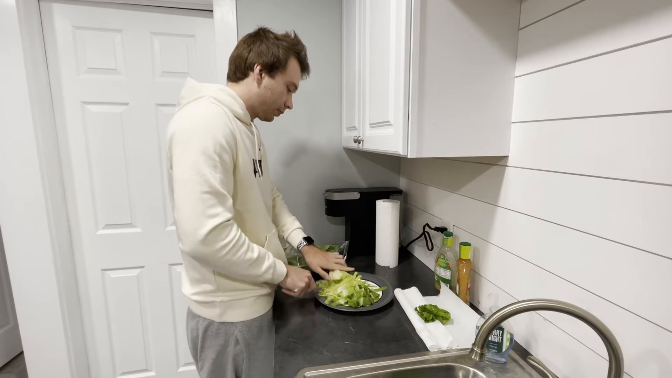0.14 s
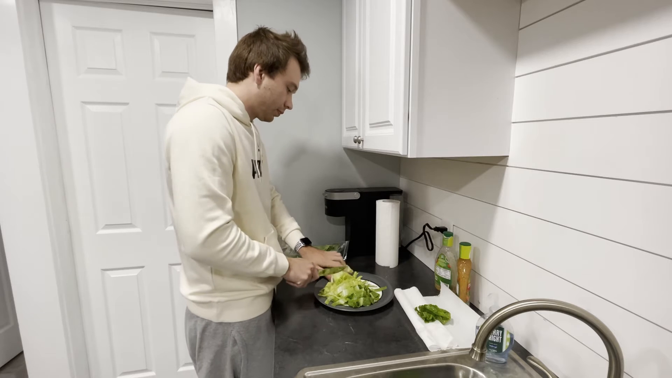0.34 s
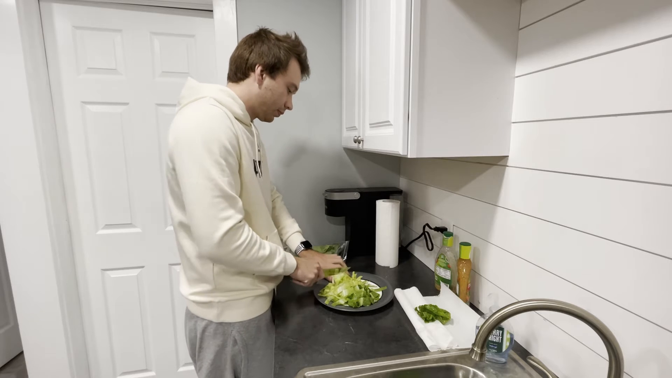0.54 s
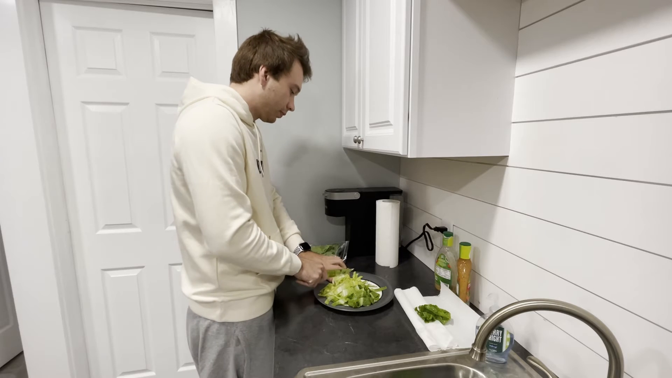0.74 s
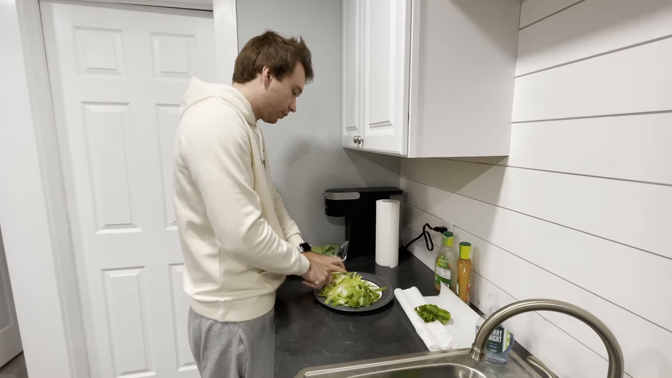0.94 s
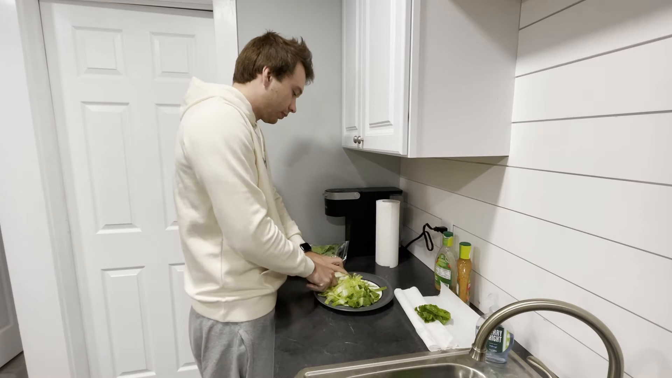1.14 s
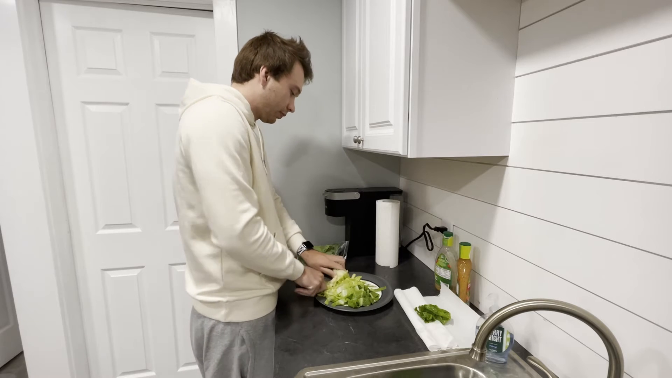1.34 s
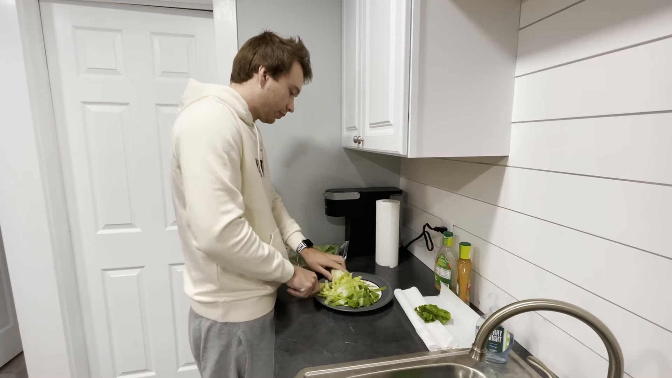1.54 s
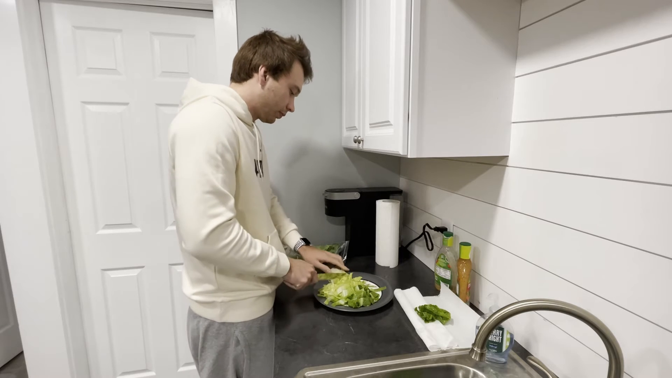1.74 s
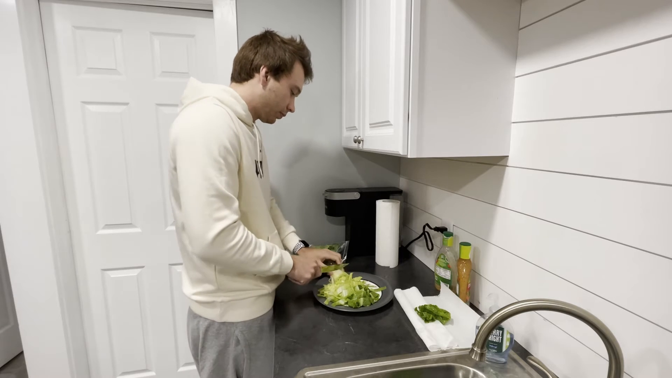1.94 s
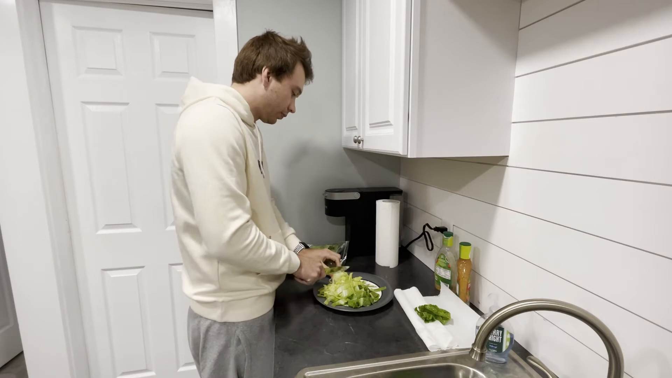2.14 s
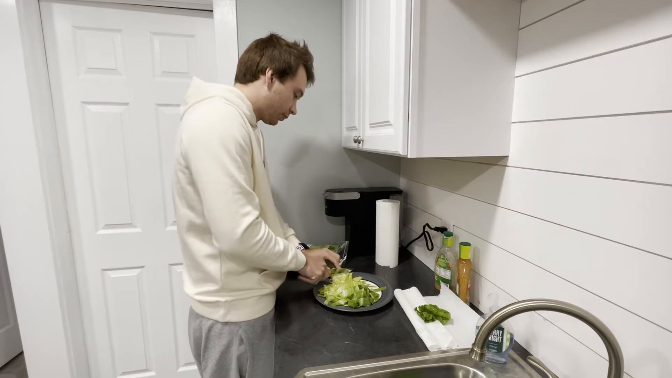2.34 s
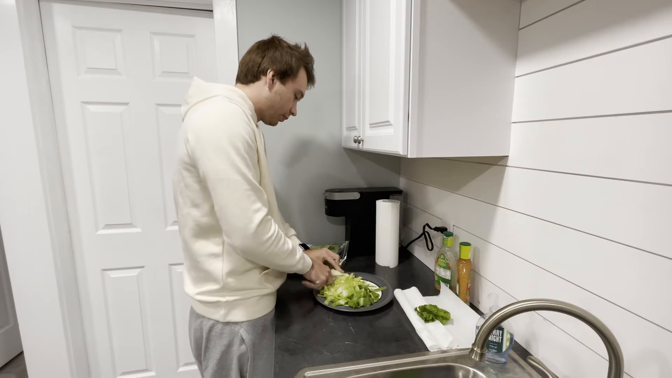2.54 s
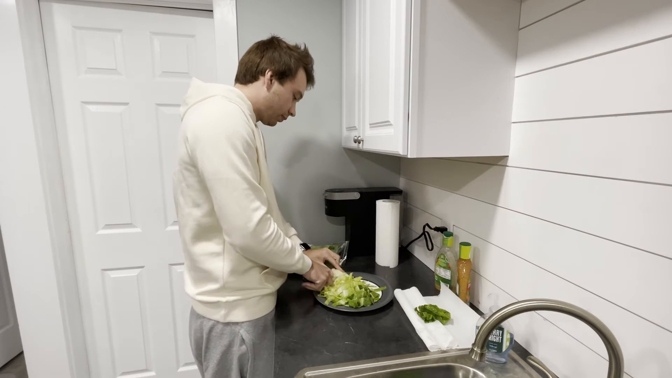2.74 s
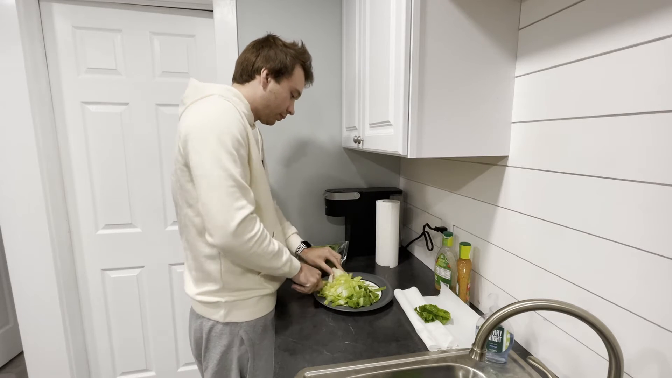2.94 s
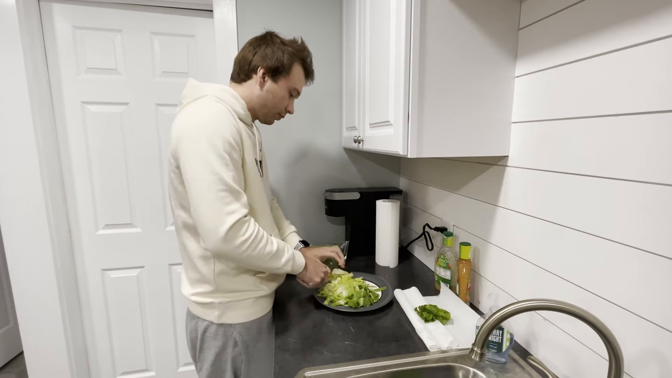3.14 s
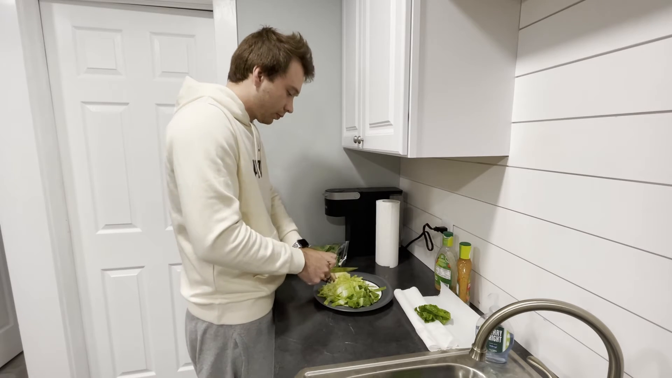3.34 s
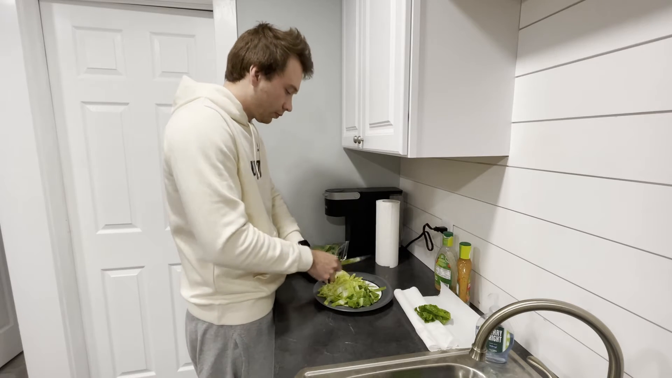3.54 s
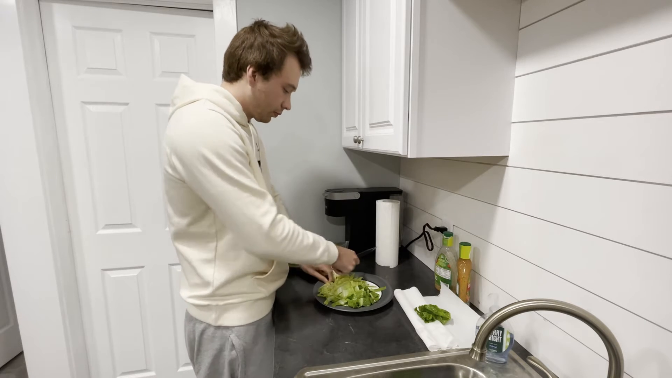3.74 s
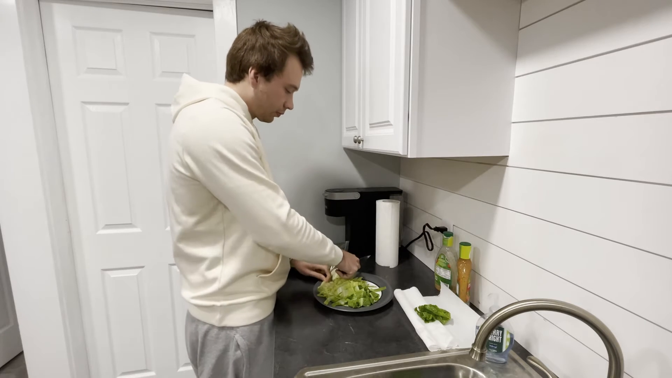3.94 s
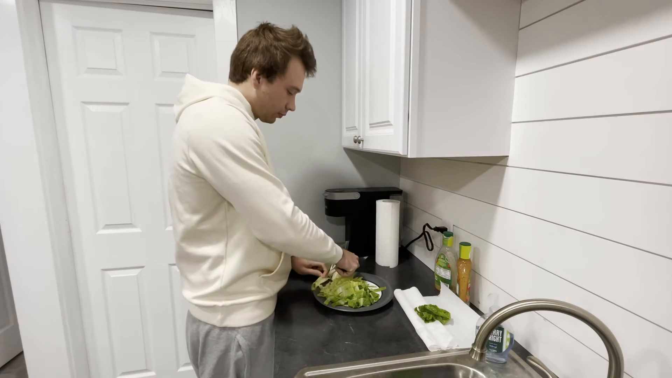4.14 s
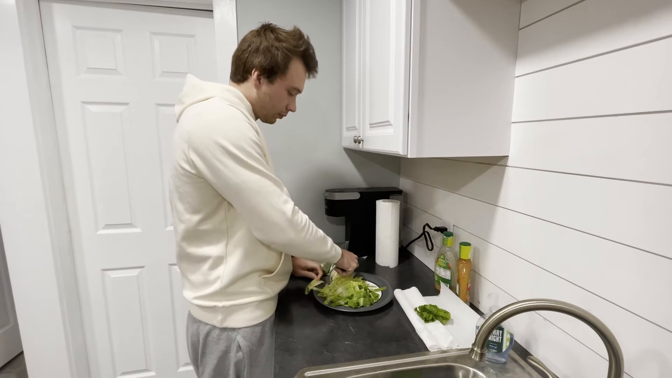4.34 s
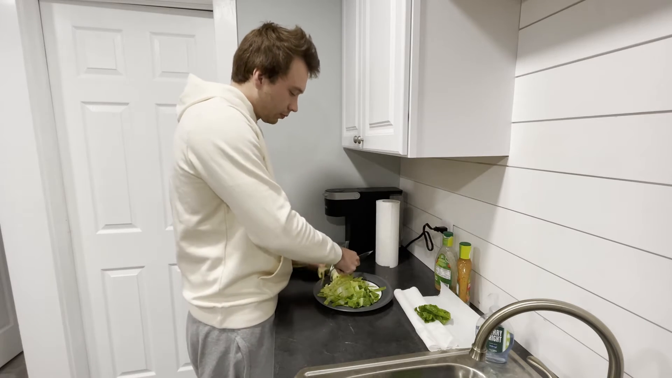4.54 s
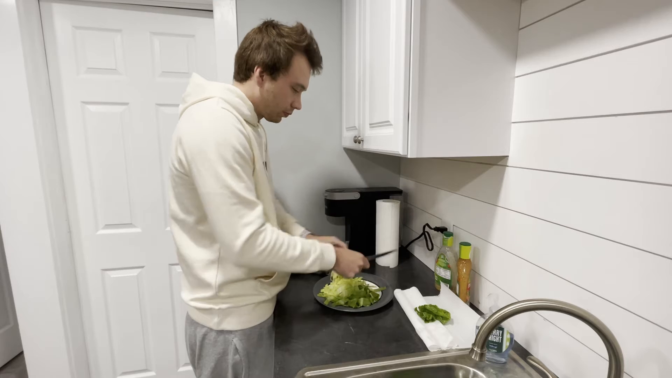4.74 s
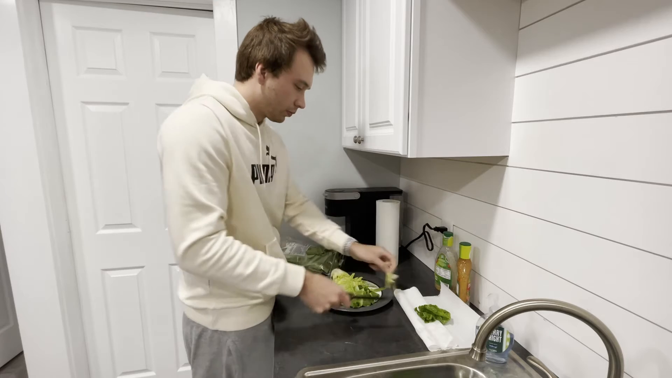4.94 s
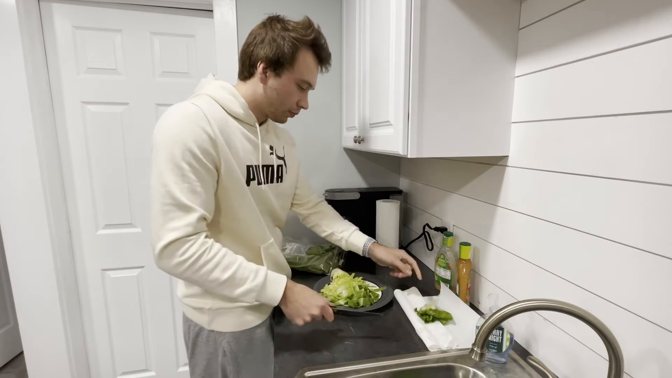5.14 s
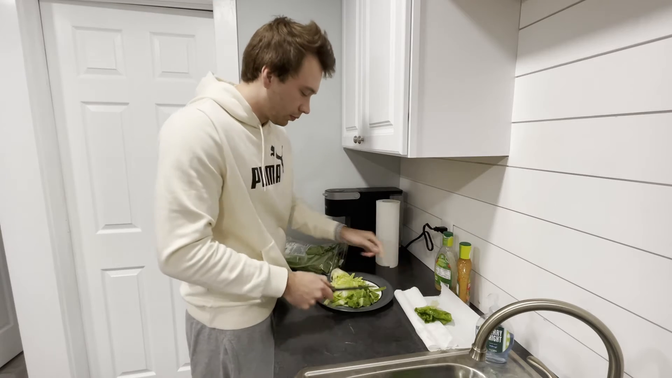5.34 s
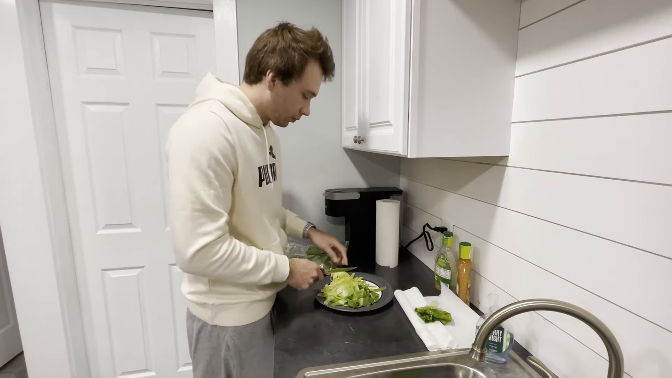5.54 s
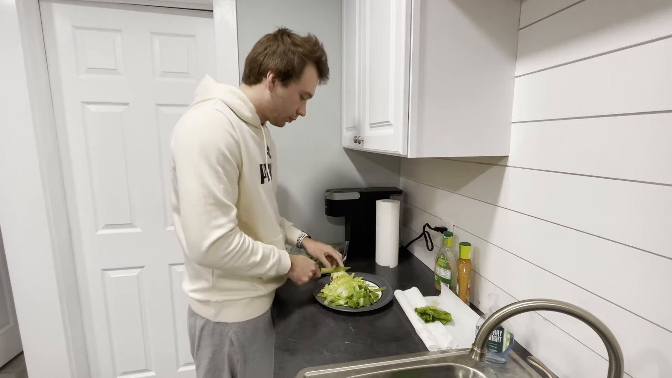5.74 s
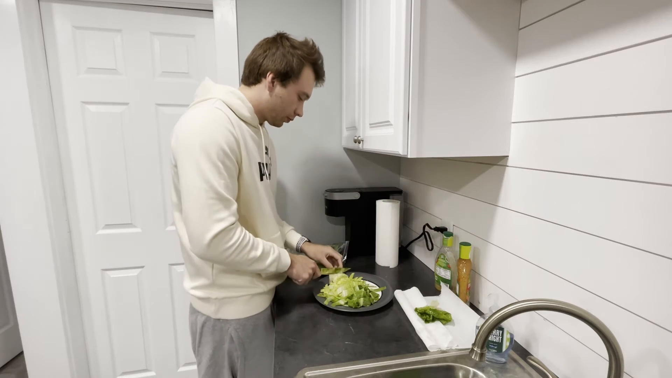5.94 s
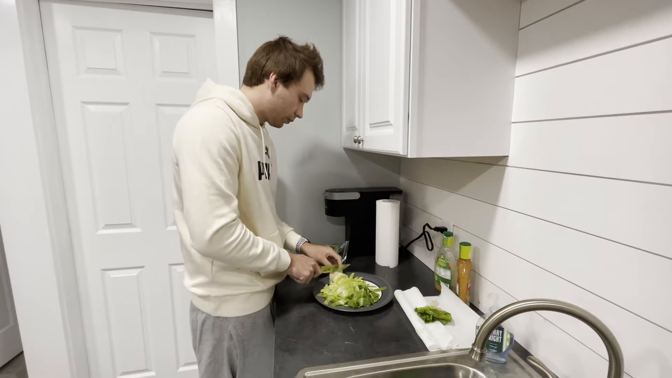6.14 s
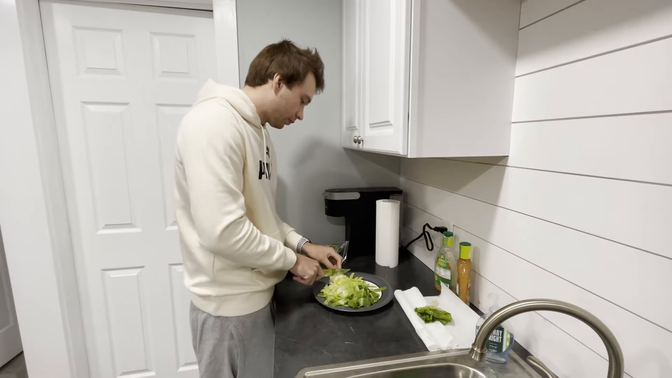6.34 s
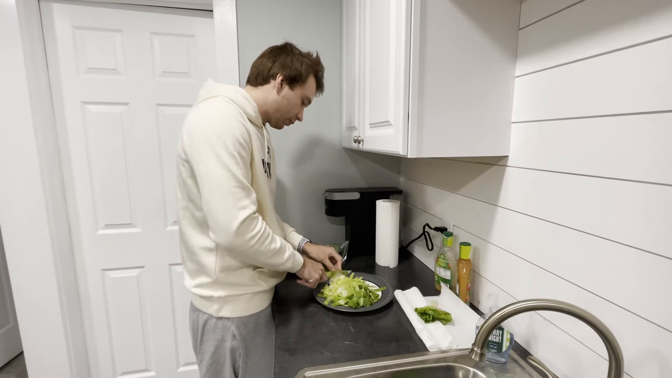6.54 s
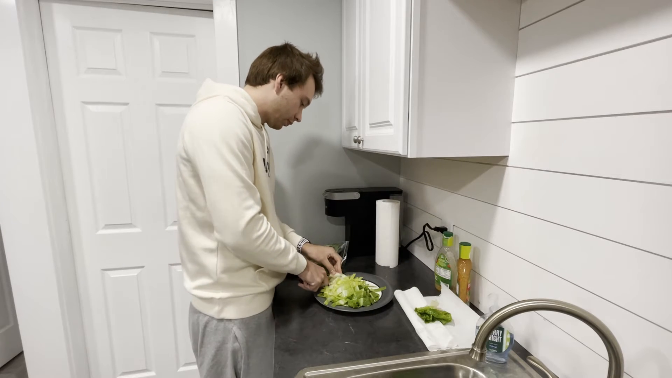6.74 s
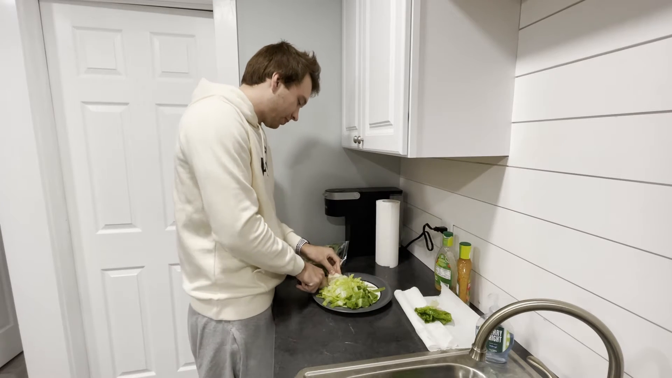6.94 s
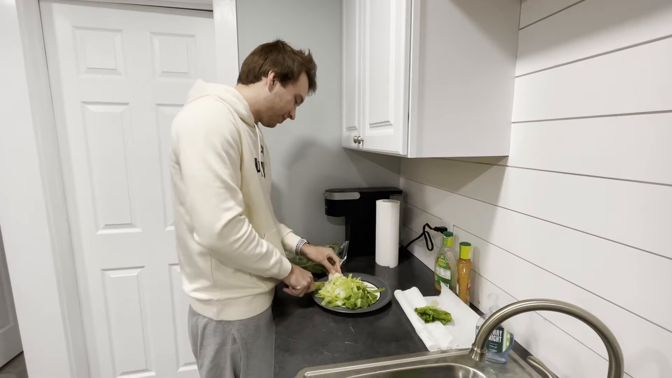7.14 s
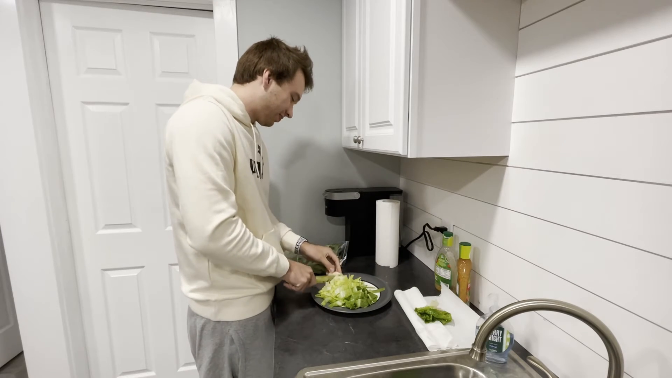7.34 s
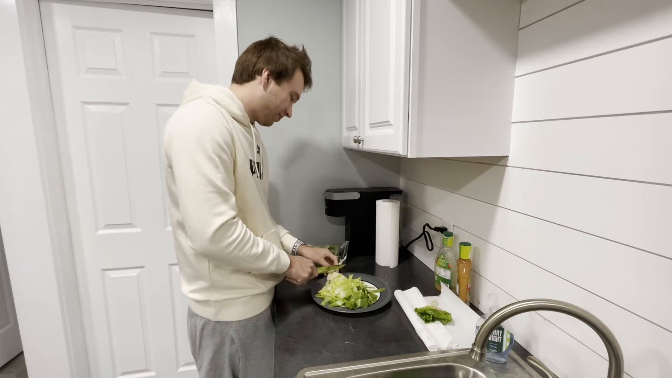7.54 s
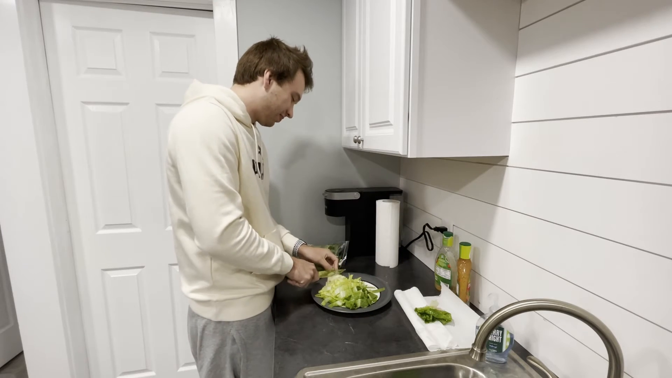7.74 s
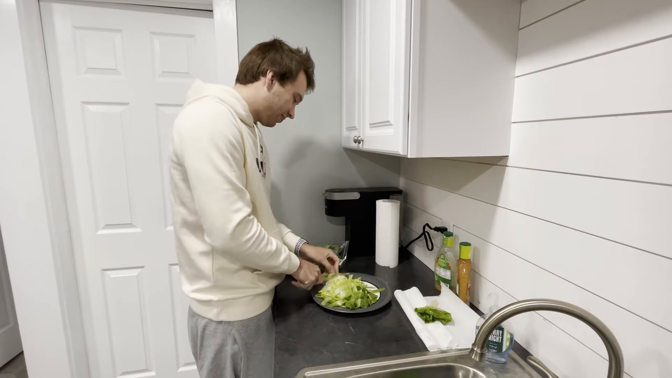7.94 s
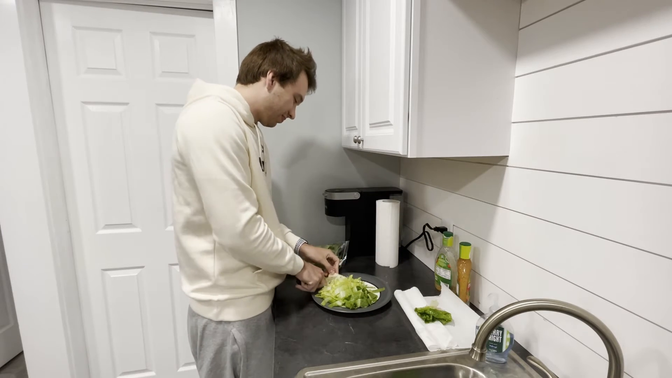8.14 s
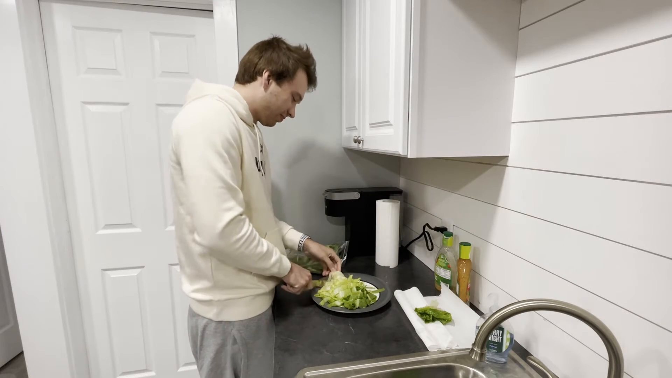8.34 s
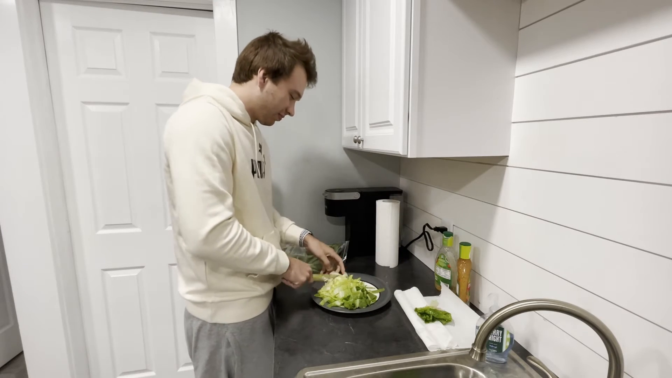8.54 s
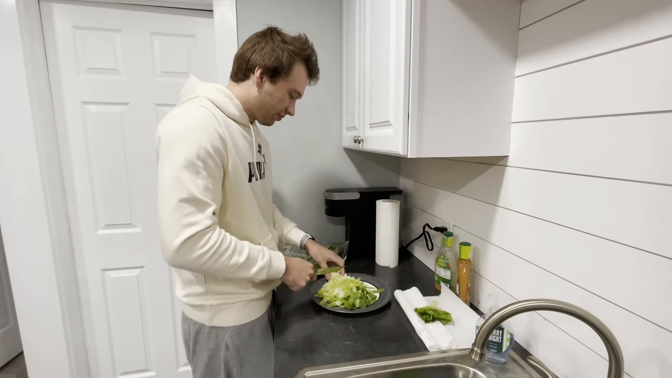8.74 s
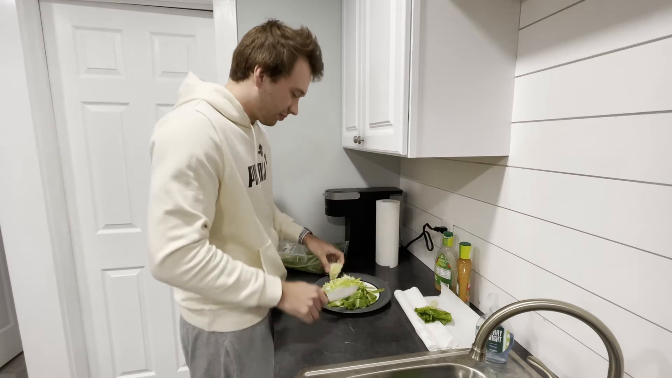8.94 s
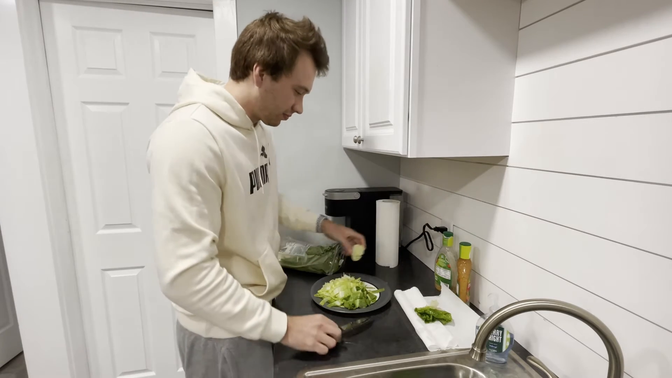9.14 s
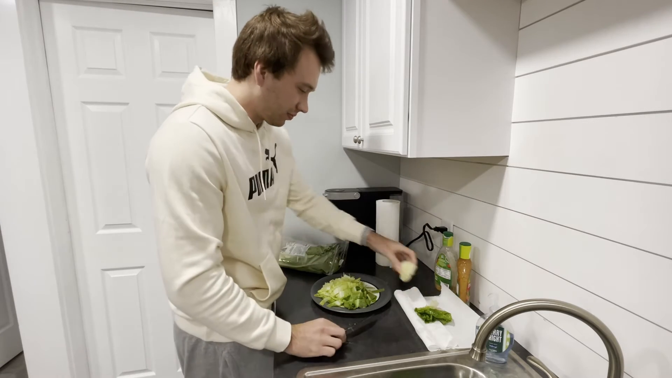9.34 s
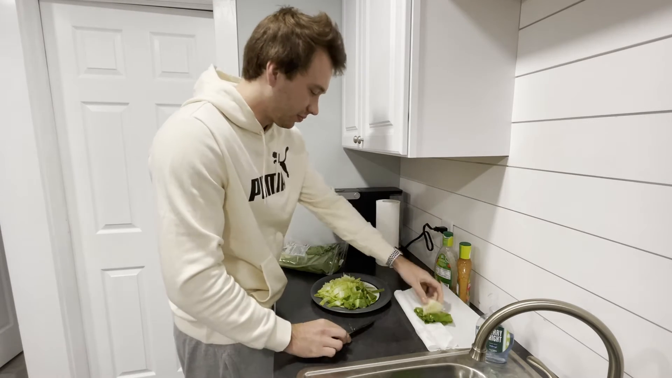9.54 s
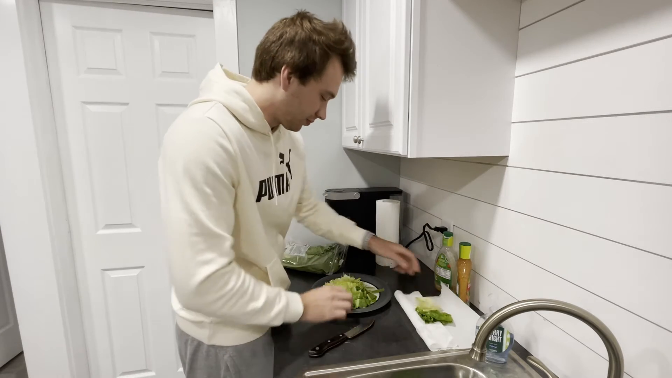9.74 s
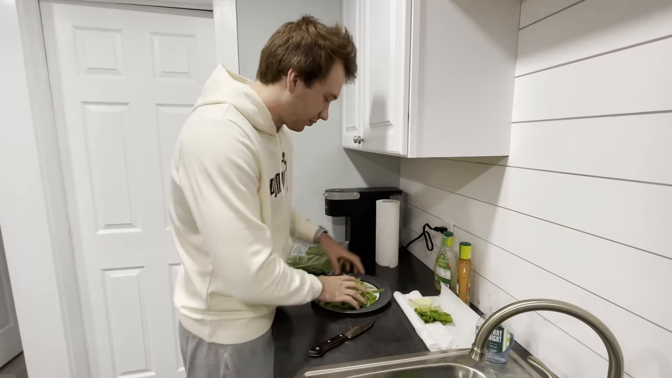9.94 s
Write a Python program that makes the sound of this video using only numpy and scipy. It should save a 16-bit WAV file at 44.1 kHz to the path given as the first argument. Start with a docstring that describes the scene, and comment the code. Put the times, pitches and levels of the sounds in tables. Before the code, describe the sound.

Crisp lettuce is cut on a plate at a kitchen counter, heard near in stereo with short room reflections and low background rush. Each slice builds from crackle and snapping ribs through a dull push to a bright clack, usually with a short scrape. Four cuts come unevenly, the last two loudest, separated by sparse leaf rustles and soft bumps. A knife is put down at the end.

```python
"""A short scrape of a blade on a plate, already under way, over the low steady rush of the house.
Then a knife slices four times through crisp lettuce: leaves crackle and snap (random click trains and
noise bursts through resonances), the push rumbles through the counter (low-coloured clicks), and
the blade clacks on the plate (coloured pulses, beating modes) and scrapes out (pressed resonances).
Between cuts the leaves are handled; at the end the knife is put down on the counter."""
import sys
import numpy as np
from scipy import signal
from scipy.fft import rfft, irfft
from scipy.io import wavfile
from scipy.ndimage import uniform_filter1d

SR = 44100
rng = np.random.default_rng(int(sys.argv[2]) if len(sys.argv) > 2 else 0)


def materialize(psi):
    """Save the field psi as 16-bit PCM at rate SR to the path in sys.argv[1].

    A 1-D psi becomes a single channel; in a 2-D psi each row is a channel.
    """
    bounded = np.clip(np.atleast_2d(psi).T, -1, 1)
    quanta = np.round(bounded * 32767).astype(np.int16)
    wavfile.write(sys.argv[1], SR, quanta)


N = 440997


def amp(db):
    """Decibels to gain."""
    return 10 ** (np.asarray(db) / 20)


def unit(x):
    """Scales to an rms of one."""
    return x / np.sqrt(np.mean(x ** 2) + 1e-20)


def read(points, hz):
    """Interpolates a table on a log-frequency axis."""
    f, value = np.transpose(points)
    return np.interp(np.log(hz + 1), np.log(f + 1), value)


def add(mix, start_s, sound):
    """Adds a sound at a time; it may already be under way at zero."""
    at = round(start_s * SR)
    sound = sound[max(-at, 0):]
    part = mix[max(at, 0):][:len(sound)]
    part += sound[:len(part)]


def click(points, corner_hz=1e6, size=4096):
    """Causal (minimum-phase) pulse of unit energy with a given spectrum, dulled above a corner."""
    hz = abs(np.fft.fftfreq(size, 1 / SR))
    gain = amp(read(points, hz)) / np.sqrt(1 + (hz / corner_hz) ** 4)
    log_gain = np.log(gain + 1e-5)
    pulse = np.fft.ifft(np.exp(np.conj(signal.hilbert(log_gain)))).real
    return pulse / np.linalg.norm(pulse)


def colour(x, points, corner_hz=1e6):
    """Filters a sound by a spectrum."""
    return signal.oaconvolve(x, click(points, corner_hz))[:len(x)]


def resonate(x, hz, width_hz):
    """Steep resonance of gain one that can follow a pitch curve: shift to zero, lowpass, shift back."""
    turn = np.exp(2j * np.pi * np.cumsum(hz * np.ones(len(x))) / SR)
    r = np.exp(-np.pi * width_hz / SR)
    shifted = x * turn.conj() + 1e-18
    return 2 * (turn * signal.lfilter([(1 - r) ** 2], [1, -2 * r, r ** 2], shifted)).real


def grains(per_s, spread_db, cap=2.9):
    """Random train of tiny clicks of either sign, their sizes spread exponentially in dB up to a cap."""
    size = amp(spread_db * np.minimum(rng.exponential(1, N), cap))
    sign = rng.choice([-1, 1], N)
    return unit(size * sign * (rng.random(N) < per_s / SR))


def envelope(length_s, attack_s, release_s):
    """Attack, hold and release of one movement, and its progress from 0 to 1."""
    t = np.arange(0, length_s + 8 * release_s, 1 / SR)
    gain = np.minimum(t / attack_s, 1) * np.exp(-np.maximum(t - length_s, 0) / release_s)
    return gain, np.minimum(t / length_s, 1)


# left-right coherence: hz, likeness (0-1)
LIKENESS = [(60, 0.89), (130, 0.87), (290, 0.46), (640, 0.067), (1400, 0.035), (2400, 0.48), (4400, 0.033),
            (8000, 0.88), (14000, 0.5)]
# left minus right: hz, balance_db
BALANCE = [(60, -2.5), (200, -4), (380, -0.5), (700, 2.5), (1300, 1), (2400, 1.5), (4400, 4), (8000, -2),
           (14000, -2.5)]
# phase by which the left leads: hz, lead_rad
LEAD = [(340, 0), (1400, 0), (3200, 0.37), (5000, 0.96), (7500, 0.37)]


def ports(pair):
    """Two unrelated signals become a microphone pair, alike to a degree that varies with frequency."""
    a, b = rfft(pair)
    hz = np.fft.rfftfreq(pair.shape[1], 1 / SR)
    same = np.clip(read(LIKENESS, hz), -1, 1)
    lean = amp(read(BALANCE, hz) / 2)
    left = a * lean * np.exp(1j * read(LEAD, hz))
    right = (same * a + np.sqrt(1 - same ** 2) * b) / lean
    return irfft(np.array([left, right]), pair.shape[1])


# spectrum of the house rush: hz, level_db
AIR_COLOUR = [(15, -45.5), (25, -26), (48, -3.5), (96, 2), (178, -16), (253, -10), (421, -9), (482, -17),
              (552, -9.5), (598, -18.5), (997, -15.5), (1140, -23), (1530, -26), (3170, -43),
              (10500, -50.5), (15500, -63.5)]


def air(level_db=-53.5):
    """The low steady rush of the house: coloured stereo noise."""
    noise = rng.standard_normal((2, N + 4097))
    coloured = np.array([colour(n, AIR_COLOUR) for n in noise])
    return amp(level_db) * unit(ports(coloured)[:, -N:])


# decay of the kitchen: hz, t60_s
ROOM_T60 = [(60, 1.5), (200, 1.12), (600, 0.79), (2000, 0.6247), (4000, 0.5969), (9000, 0.54), (15000, 0.5)]


def kitchen(x, tail_db, early_s=.0095, direct=2.5, bass_hz=220, size=32768):
    """Counter, wall and cupboard answer within a few milliseconds; then the small room dies away."""
    t = np.arange(size) / SR
    taps = rng.choice([-1., 1.], (2, size)) * (rng.random((2, size)) < 2000 / SR)
    early = taps * (t < early_s)
    early[0, 0] = direct
    # flatten the spectrum repeatedly: reflections scatter with little colour
    for _ in range(12):
        z = rfft(early)
        early = irfft(z / (abs(z) + 1e-9)) * (t < 2 * early_s)
    hz, at, z = signal.stft(taps * (t > early_s), SR, nperseg=256)
    fade = np.exp(-np.log(1000) * at / read(ROOM_T60, hz)[:, None])
    tail = signal.istft(z * fade, SR, nperseg=256)[1][:, :size]
    # light walls let the bass out
    tail = signal.sosfilt(signal.butter(1, bass_hz, "high", fs=SR, output="sos"), tail)
    response = unit(early) + amp(tail_db) * unit(tail)
    response = np.pad(response, [(0, 0), (size, 0)]) / np.sqrt(size)
    return signal.fftconvolve(x[None], ports(response), axes=1)[:, size:N + size]


# blade pushed down through the head, one to three per cut: start_s, length_s, crackle_db, leaf_body_db,
# counter_push_db, build_up_db, first_resonance_hz, last_resonance_hz
STROKES = [(0.85, .33, -39, -37, -29.5, 15.5, 1270, 1110),
           (1.217, 0.16, -34.5, -53, -34.5, 29.5, 1550, 1400),
           (2.297, 0.27, -41.5, -48.5, -32.5, 22.5, 1949, 1513),
           (2.562, 0.13, -36, -46.5, -27.5, 8, 1500, 1089),
           (6.304, 0.48, -51, -52.5, -44, 12.5, 1880, 1782),
           (6.634, 0.078, -43.5, -45, -29.5, 1.5, 1520, 2465),
           (6.796, 0.062, -33.5, -39.5, -26.5, 5.5, 1970, 1739),
           (7.796, 0.37, -35.5, -39, -27, 34, 2200, 1858)]
BITE_S, LET_GO_S, BUILD_CURVE = 0.0059, 0.018, 1.5


def pressing(layer):
    """Stroke gain of layer 0 crackle, 1 leaf body or 2 push: builds up, levels off, lets go."""
    out = np.zeros(N)
    for start_s, length_s, *layers_db, build_db, _, _ in STROKES:
        gain, depth = envelope(length_s, BITE_S, LET_GO_S)
        add(out, start_s, gain * amp(layers_db[layer] - build_db * (1 - depth) ** BUILD_CURVE))
    return out


def leaf_pitch(rest_hz=1650):
    """Hollow pitch of the packed leaves over time: it glides during each stroke."""
    hz = np.full(N, float(rest_hz))
    for start_s, length_s, *_, first_hz, last_hz in STROKES:
        depth = envelope(length_s, BITE_S, LET_GO_S)[1]
        hz[round(start_s * SR):][:len(depth)] = first_hz + (last_hz - first_hz) * depth
    return hz


# edge dragged out over the plate: start_s, length_s, scrape_db, crackle_db, counter_push_db, easing_off_db
SCRAPES = [(-.03, 0.12, -33, -44, -32.5, 13), (1.372, 0.19, -32.5, -49.5, -29, 21.5),
           (2.8, 0.15, -45.5, -42.5, -36.5, 0.5), (7.043, 0.095, -41.5, -42, -44, -0.5),
           (8.349, 0.07, -37.5, -52.5, -44, 8)]
DRAG_ATTACK_S, DRAG_RELEASE_S = 0.016, 0.02


def dragging(layer):
    """Scrape gain of layer 0 scrape, 1 crackle or 2 push: the edge catches, then its level slides."""
    out = np.zeros(N)
    for start_s, length_s, *layers_db, ease_db in SCRAPES:
        gain, progress = envelope(length_s, DRAG_ATTACK_S, DRAG_RELEASE_S)
        add(out, start_s, gain * amp(layers_db[layer] - ease_db * progress))
    return out


# worktop and cupboard modes: hz, level_db
COUNTER = [(172, -4), (308, -1), (348, -3), (407, -2.5), (552, -1.5), (663, -1.5), (815, -3), (893, -0.5),
           (940, -1), (1100, -0.5), (1413, -3.5)]
# spectrum of the deep thud: hz, level_db
THUD_COLOUR = [(20, -33.5), (42, -24.5), (62, 4), (140, -0.5), (220, -10), (320, -7), (500, -14),
               (1200, -23.5), (5000, -48)]
# spectrum of the hollow clatter: hz, level_db
CLATTER_COLOUR = [(40, -39), (150, -14), (230, -11), (310, -7), (420, -3), (520, -10.5), (660, -4),
                  (800, -3.5), (1100, -4.5), (1600, -8), (2150, -9.5), (2900, -16.5), (6000, -14),
                  (15000, -16.5)]
COUNTER_T60_S, COUNTER_RING_DB = .2, -4


def knock(corner_hz, clatter_db, fade_s, first_db, size=16384):
    """Firm contact and chatter on the counter: deep thud, hollow clatter and worktop ring."""
    t = np.arange(size) / SR
    contacts = rng.standard_normal((2, size)) * np.exp(-t / fade_s)
    contacts[:, 0] = amp(first_db)
    thud = unit(colour(contacts[0], THUD_COLOUR, corner_hz))
    clatter = unit(colour(contacts[1], CLATTER_COLOUR, corner_hz))
    modes = np.zeros(size)
    for hz, db in COUNTER:
        gain = amp(db) * rng.choice([-1, 1]) / np.hypot(1, (hz / corner_hz) ** 2)
        modes += gain * np.sin(2 * np.pi * hz * t)
    ring = unit(modes * np.exp(-np.log(1000) * t / COUNTER_T60_S))
    hollow = unit(clatter + amp(COUNTER_RING_DB) * ring)
    return (thud + amp(clatter_db) * hollow) / np.sqrt(size)


# hand, blade and plate bump the counter: start_s, level_db, corner_hz, fade_s
KNOCKS = [(.742, -27.5, 300, 0.025), (2.566, -19, 246, 0.0077), (4.058, -37, 200, 0.015),
          (4.118, -36, 252, 0.016), (4.336, -33.5, 180, 0.026), (5.273, -34.5, 917, .005),
          (5.294, -45.5, 1140, 0.048), (5.944, -35.5, 178, 0.019), (7.149, -20.5, 499, 0.038),
          (7.275, -24.5, 324, 0.033), (7.968, -17, 189, 0.013), (8.357, -16, 694, 0.013),
          (8.39, -19.5, 455, 0.022), (8.624, -31, 180, .018), (8.68, -29.5, 231.4, 0.011)]
# blade meets plate: start_s, level_db, weight_db, corner_hz, ring_db, favoured_hz, favoured_db, thud_db
CLACKS = [(1.358, -11, -15, 3500, 2, 2050, 6.5, -37), (1.49, -41.5, -11.5, 3500, 13.5, 1280, 4, -69),
          (2.692, -12, -7, 4300, 0.5, 2750, -1, -26), (2.955, -33, -13.5, 5000, 9.5, 1240, 15.5, -73),
          (3.133, -38, -7, 5000, -15, 2540, 29, -58), (3.9858, -47.5, -4, 4000, 6.5, 2450, 8, -65),
          (6.8719, -0.5, -2.5, 6310, -1.5, 3280, 1, -13.5), (8.145, 0, 2.5, 8780, -4, 2804, -0.5, -17),
          (8.359, -29, -11, 3200, 6.5, 3700, 8, -47.5)]
# cut blow passed through the plate to the counter
THUD_CORNER_HZ, THUD_FADE_S = 706, 0.034
# a blow with a higher corner has more clatter; it equals the thud at CLATTER_EVEN_HZ
CLATTER_EVEN_HZ, CLATTER_DB_PER_OCTAVE = 713.5, 10


def knocks(gain_db=20):
    """The counter answers each bump and each blow of the blade on the plate."""
    out = np.zeros(N)
    thuds = [(start_s, thud_db, THUD_CORNER_HZ, THUD_FADE_S) for start_s, *_, thud_db in CLACKS]
    for start_s, db, corner_hz, fade_s in list(KNOCKS) + thuds:
        clatter_db = CLATTER_DB_PER_OCTAVE * np.log2(corner_hz / CLATTER_EVEN_HZ)
        add(out, start_s, amp(db + gain_db) * knock(corner_hz, clatter_db, fade_s, first_db=21))
    return out


# knife put down, handle first, then blade, and settles: start_s, level_db, corner_hz, tick_db, rattle_db
LANDINGS = [(9.623, -24, 950, -25.5, -44), (9.632, -28, 800, -45, -48), (9.645, -25.5, 950, -31, -31),
            (9.7216, -28, 1590, -14.5, -35), (9.729, -24.5, 1520, -32, -19.5),
            (9.773, -32, 1510, -55, -25.5), (9.7922, -29, 1220, -26, -37)]
# spectrum of the steel tick: hz, level_db
TICK_COLOUR = [(300, -34), (1500, -32.5), (3500, 18.5), (5500, -1), (9000, 1), (12000, -3), (15500, -28)]
# flat of the blade on the worktop
RATTLE_HZ, RATTLE_WIDTH_HZ, RATTLE_FADE_S = 1950, 380, 0.01


def landings(gain_db=20, tick_gain_db=9, size=8192):
    """The knife lands on the counter: a knock, a tick of steel and a fading noise rattle."""
    out, t = np.zeros(N), np.arange(size) / SR
    for start_s, db, corner_hz, tick_db, rattle_db in LANDINGS:
        blow = knock(corner_hz, clatter_db=16.5, fade_s=0.038, first_db=23)
        add(out, start_s, amp(db + gain_db) * blow)
        add(out, start_s, amp(tick_db + tick_gain_db) * click(TICK_COLOUR))
        rattle = unit(resonate(rng.standard_normal(size), RATTLE_HZ, RATTLE_WIDTH_HZ))
        add(out, start_s, amp(rattle_db) * rattle * np.exp(-t / RATTLE_FADE_S))
    return out


# spectrum of the push on the counter: hz, level_db
PUSH_COLOUR = [(20, -43), (42, -25), (60, 5.5), (95, -1.5), (130, 1), (180, -4.5), (225, -14), (280, -4.5),
               (330, -8.5), (420, -23), (900, -33.5), (3000, -70)]
# blade judders through dense ribs: start_s, length_s, level_db, rate_hz
JUDDERS = [(2.497, 0.014, -29.5, 90), (2.587, 0.01, -27, 75), (2.655, 0.023, -28, 114.5),
           (3.144, .055, -47.5, 66.2), (7.975, 0.12, -29, 128.3)]


def push(slice_db=-4, scrape_db=-6, judder_width_hz=40):
    """Each layer that gives way jolts plate and counter; in dense ribs the jolts fall into a judder."""
    force = amp(slice_db) * pressing(layer=2) + amp(scrape_db) * dragging(layer=2)
    out = colour(force * grains(per_s=840, spread_db=0.5), PUSH_COLOUR)
    for start_s, length_s, db, rate_hz in JUDDERS:
        gain = envelope(length_s, BITE_S, LET_GO_S)[0]
        judder = unit(resonate(rng.standard_normal(len(gain)), rate_hz, judder_width_hz))
        add(out, start_s, amp(db) * gain * judder)
    return out


def cluster(t, hz, split_hz, count=10):
    """The uneven load of leaves splits a mode into close partials that beat."""
    partials = hz + split_hz * ((np.arange(count) + rng.random(count)) / count - .5)
    return np.sin(2 * np.pi * (partials[:, None] * t + rng.random((count, 1)))).sum(0)


def ringing(modes, drive, corner_hz, size=32768):
    """Free ring of plate or blade; drive(hz) gives the dB by which each mode is woken."""
    out, t = np.zeros(size), np.arange(size) / SR
    for hz, mode_db, t60_s, split_hz in modes:
        fade = np.exp(-np.log(1000) * t / t60_s)
        mode = unit(cluster(t, hz, split_hz) * fade) * np.sqrt(np.mean(fade ** 2) / 2)
        out += amp(mode_db + drive(hz)) * mode / np.hypot(1, (hz / corner_hz) ** 2)
    return out


# ring of the plate: hz, level_db, t60_s, split_hz
PLATE = [(312, -11.5, 1, 14), (625.5, 5, 0.18, 100), (726, -4, 0.22, 190), (958, -7.5, 0.13, 110),
         (1238, -6, 0.27, 110), (1444, -11.5, 0.29, 80), (1946, -9.5, 0.16, 47), (2127, -5, 0.21, 120),
         (2773, -4.5, .27, 150), (3156, -8, 0.22, 220), (3430, -1, .18, 110), (3560, -11, 0.33, 190),
         (5080, -9.5, .2, 280), (8350, -14, 0.28, 91)]
# plate resonances while the blade presses on it: hz, width_hz, level_db
PRESSED = [(938, 220, 2.5), (1229, 150, 8.5), (2140, 250, 6), (2774, 200, 6.5), (3580, 260, -3.5),
           (5114, 180, -11)]
RIM_DB_PER_OCTAVE = 3.5


def scrape(gain_db=-0.5, pivot_hz=2000, free_db=-11, free_low_hz=1000, free_corner_hz=4500):
    """The edge sticks and slips on the glaze; nearer the rim low modes take over; the plate rings on."""
    slips, travel = grains(per_s=1100, spread_db=5.5), np.zeros(N)
    for start_s, length_s, *_ in SCRAPES:
        add(travel, start_s, envelope(length_s, DRAG_ATTACK_S, DRAG_RELEASE_S)[1] - .5)
    pressed = np.zeros(N)
    for hz, width_hz, db in PRESSED:
        tilt_db = RIM_DB_PER_OCTAVE * travel * np.log2(hz / pivot_hz)
        pressed += amp(db - tilt_db) * unit(resonate(slips, hz, width_hz))

    def low_cut_db(hz):
        return -10 * np.log10(1 + (free_low_hz / hz) ** 4)

    free = ringing(PLATE, low_cut_db, free_corner_hz)
    force = dragging(layer=0)
    ring = signal.oaconvolve(force * slips, free / np.linalg.norm(free))[:N]
    return amp(gain_db) * force * unit(pressed) + amp(free_db) * ring


# steel of the blade: hz, level_db, t60_s, split_hz
BLADE = [(3810, 3, .12, 110), (4180, -2, .28, 220), (5590, -11.5, 0.24, 200), (5875, -13.5, 0.19, 96),
         (6920, -8.5, .22, 170), (7130, -15, .23, 45), (10060, -10, .19, 110)]
# spectrum of the blow on the plate: hz, level_db
CLACK_COLOUR = [(100, -33.5), (400, -16), (630, -1), (950, -6.5), (1100, -11), (1300, -3.5), (1720, -25.5),
                (2080, -2), (2530, -15), (2780, 2.5), (2960, -4.5), (3200, -1), (3680, 4), (3930, -11),
                (4150, -4.5), (4550, -19), (5120, -7.5), (6200, -27.5), (6880, -14), (7400, -23.5),
                (10000, -19), (15000, -30.5)]
BLADE_DB_PER_DB = 0.3  # harder blows wake more steel
STRUCK_WIDTH_HZ = 260


def clacks(blow_db=15, modes_db=-19, weight_hz=1000, bounce_s=.0035, bounce_db=-6):
    """The blade strikes the plate: a hard blow and a tiny bounce, then plate and steel ring out."""
    out = np.zeros(N)
    for start_s, db, weight_db, corner_hz, ring_db, struck_hz, struck_db, _ in CLACKS:

        def drive(hz):
            """Weight acts on the low modes; the struck spot raises or lowers a few others."""
            low_db = weight_db / (1 + (hz / weight_hz) ** 2)
            return low_db + struck_db / (1 + ((hz - struck_hz) / STRUCK_WIDTH_HZ) ** 2)

        spectrum = [(hz, level_db + drive(hz)) for hz, level_db in CLACK_COLOUR]
        blow = amp(db + blow_db) * click(spectrum, corner_hz)
        chatter = rng.standard_normal(256)
        bounce = np.convolve(blow, chatter / np.linalg.norm(chatter))
        add(out, start_s, blow)
        add(out, start_s + bounce_s, amp(bounce_db) * bounce)
        steel = amp(BLADE_DB_PER_DB * db) * ringing(BLADE, drive, corner_hz)
        plate = ringing(PLATE, drive, corner_hz)
        add(out, start_s, amp(db + modes_db + ring_db) * (plate + steel))
    return out


# fingers gather and shift the leaves: start_s, length_s, level_db
RUSTLES = [(0.11, 0.16, -58), (0.417, 0.12, -66), (0.576, 0.67, -61), (0.702, 0.12, -61.5),
           (1.596, 0.1, -63.5), (2.107, 0.22, -63.5), (3.099, 0.049, -58), (3.624, 0.13, -73),
           (3.93, 0.39, -69.5), (4.51, 0.063, -64.5), (5.218, 0.086, -70), (5.903, 0.038, -65),
           (7.303, 0.28, -75.5), (8.84, 0.066, -67)]
RUSTLE_ATTACK_S, RUSTLE_RELEASE_S = 0.038, 0.012


def handling():
    """Gain of the leaves under the fingers."""
    out = np.zeros(N)
    for start_s, length_s, db in RUSTLES:
        add(out, start_s, amp(db) * envelope(length_s, RUSTLE_ATTACK_S, RUSTLE_RELEASE_S)[0])
    return out


# thin leaves ripping: start_s, level_db, length_s
TEARS = [(2.658, -36.5, 0.036), (4.246, -59.5, 0.068), (8.125, -39.5, 0.017)]


def tears(hz=9200, width_hz=4500):
    """A thin leaf rips with a short, very bright fizz."""
    out = np.zeros(N)
    for start_s, db, length_s in TEARS:
        add(out, start_s, amp(db) * np.hanning(round(length_s * SR)))
    return out * unit(resonate(grains(per_s=2600, spread_db=4.5), hz, width_hz))


# single ribs breaking: start_s, bright_crack_db, hollow_body_db
SNAPS = [(0.2009, -59, -56), (0.2512, -61, -60), (0.6355, -46.5, -58.5), (0.7374, -39, -54.5),
         (0.9165, -29, -29.5), (0.9736, -29, -27.5), (0.996, -29, -37), (1.049, -37.5, -30),
         (1.1154, -36.5, -38.5), (1.1429, -25, -34), (1.6496, -42, -55), (2.1575, -52, -64.5),
         (2.3855, -57, -49), (2.4139, -46.5, -47.5), (2.4765, -28, -26), (2.565, -25, -30.5),
         (2.5975, -24.5, -37.5), (2.621, -31, -35), (2.658, -34.5, -20.5), (2.8549, -33, -56),
         (2.8918, -29, -37), (3.1325, -43, -46), (4.029, -55, -76), (4.116, -61, -75), (4.2254, -56, -61),
         (4.3234, -52, -50), (4.542, -58, -69), (5.7557, -53.5, -73.5), (6.3715, -45.5, -36.5),
         (6.4297, -43.5, -31), (6.565, -38.5, -28.5), (6.634, -25.5, -25), (6.6787, -23, -28.5),
         (6.802, -29, -24.5), (7.0893, -25.5, -68), (7.929, -44.5, -34.5), (7.958, -42, -32.5),
         (7.9833, -34, -29), (8.0045, -23.5, -32.5), (8.025, -28.5, -42.5), (8.9118, -49.5, -84),
         (8.939, -53.5, -82)]
# spectrum of the leaves: hz, level_db
LEAF_COLOUR = [(100, -25.5), (400, 0.5), (650, 0), (950, 4), (2200, 4), (3200, 0.5), (4200, 0.5),
               (5200, -1.5), (7000, -3.5), (10200, -5.5), (11300, -12), (12200, -17.5), (15500, -16)]


def snaps(crack_db=-18, body_db=-18.5, fade_s=0.002, width_hz=540, first_db=26, size=4096):
    """A rib breaks with one sharp crack and a quick run of smaller ones, and rings briefly."""
    out, t, pitch = np.zeros(N), np.arange(size) / SR, leaf_pitch()
    for start_s, bright_db, hollow_db in SNAPS:
        hz = pitch[round(start_s * SR)]
        cracks = rng.standard_normal(size) ** 3 * np.exp(-t / fade_s)
        cracks[0] = amp(first_db)
        add(out, start_s, amp(bright_db + crack_db) * unit(colour(cracks, LEAF_COLOUR)))
        add(out, start_s, amp(hollow_db + body_db) * unit(resonate(cracks, hz, width_hz)))
    return out


def clumps(clump_s=0.0043, depth_db=2.0):
    """Gain of small jerks: the blade advances one leaf layer at a time."""
    jerks = unit(uniform_filter1d(rng.standard_normal(N), max(round(clump_s * SR), 1)))
    return unit(amp(depth_db * np.clip(jerks, -2, 2)))


def leaf_body(width_hz=280):
    """Fibres give way in clumps and ring the packed leaves; the hollow pitch moves as the blade sinks."""
    breaks = grains(per_s=450, spread_db=3)
    return pressing(layer=1) * unit(resonate(breaks, leaf_pitch(), width_hz))


def crackle(gain_db=2.0, fizz_db=-5, handling_db=-0.5):
    """Cells burst under the edge: clicks over a fine fizz; fingers make only sparse ticks."""
    ticks = grains(per_s=400, spread_db=3.6)
    bursts = unit(ticks + amp(fizz_db) * grains(per_s=6200, spread_db=-2.5))
    cutting = amp(gain_db) * (pressing(layer=0) + dragging(layer=1)) * bursts
    fingers = amp(handling_db) * handling() * grains(per_s=350, spread_db=5.0)
    return colour(cutting + fingers, LEAF_COLOUR)


def scene():
    """Lettuce, plate and counter sound into the kitchen."""
    leaves = clumps() * (crackle() + leaf_body()) + snaps() + tears()
    lettuce = kitchen(leaves + scrape(), tail_db=-6.0)
    plate = kitchen(clacks(), tail_db=-11)
    counter = kitchen(push() + knocks() + landings(), tail_db=-15.0)
    return lettuce + plate + counter + air()


EDGE_HZ = 15900


def record(dry):
    """Rounds off the loudest peaks, then cuts steeply above the band edge."""
    rounded = dry / (1 + (dry / .88) ** 6) ** (1 / 6)
    lowpass = signal.firwin(511, EDGE_HZ, window=("kaiser", 9), fs=SR)
    return signal.oaconvolve(rounded, lowpass[None], "same")


dry = scene()
out = record(dry)
materialize(out)
```